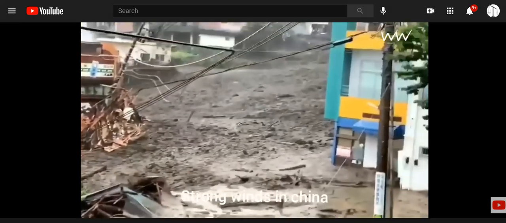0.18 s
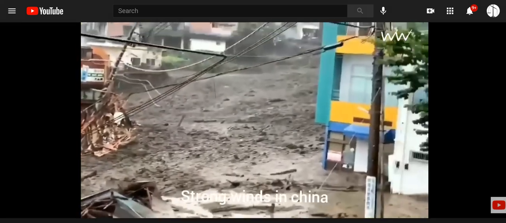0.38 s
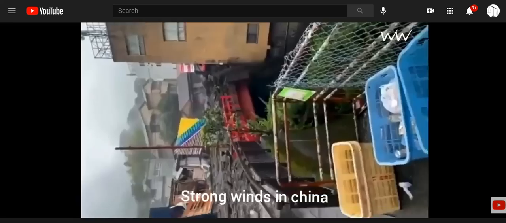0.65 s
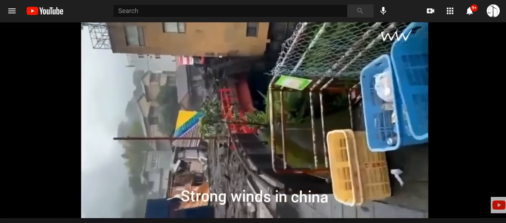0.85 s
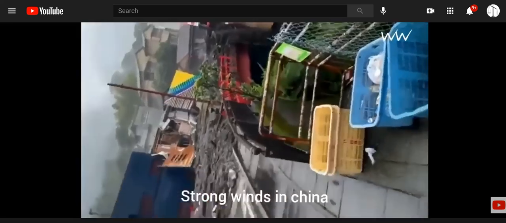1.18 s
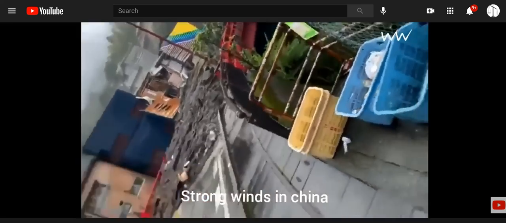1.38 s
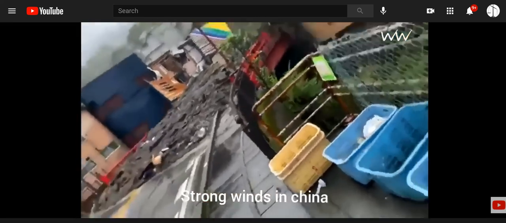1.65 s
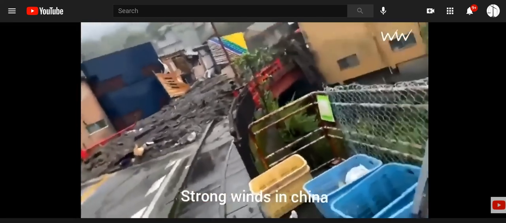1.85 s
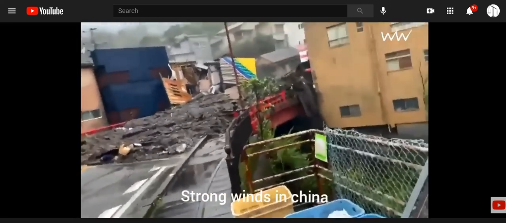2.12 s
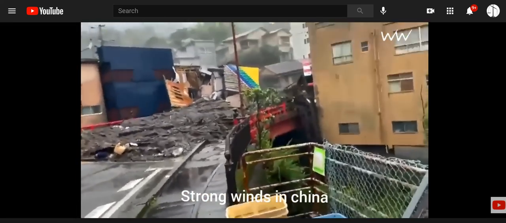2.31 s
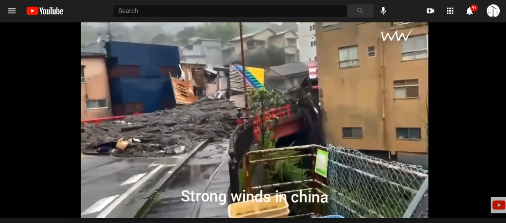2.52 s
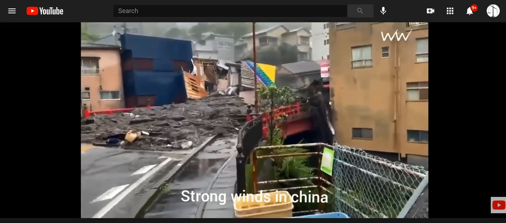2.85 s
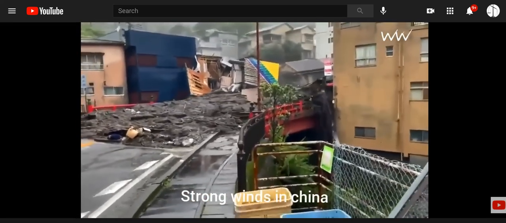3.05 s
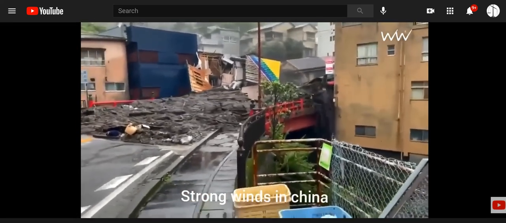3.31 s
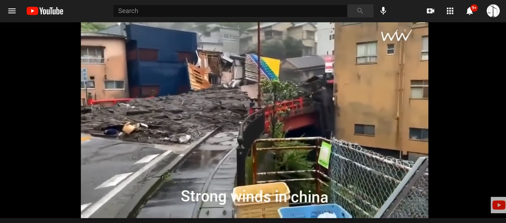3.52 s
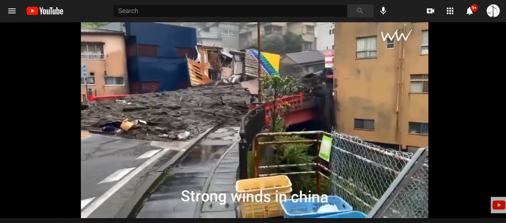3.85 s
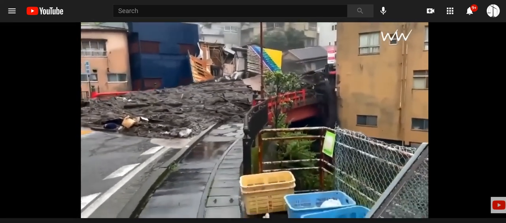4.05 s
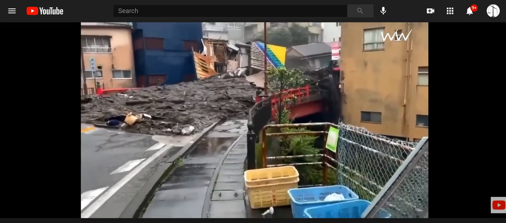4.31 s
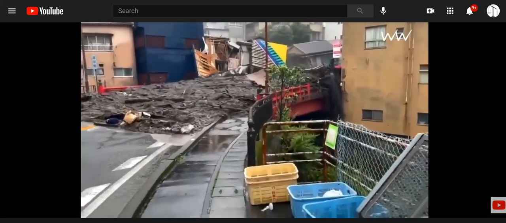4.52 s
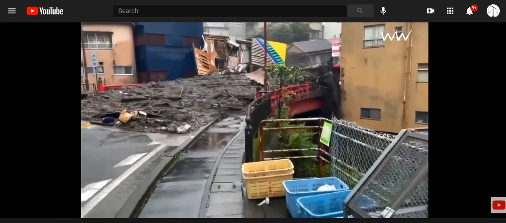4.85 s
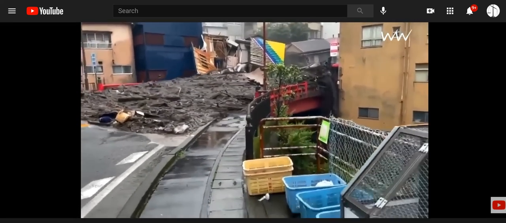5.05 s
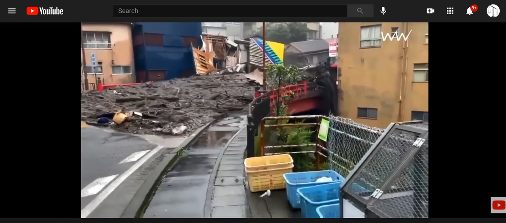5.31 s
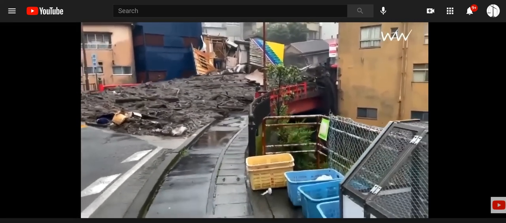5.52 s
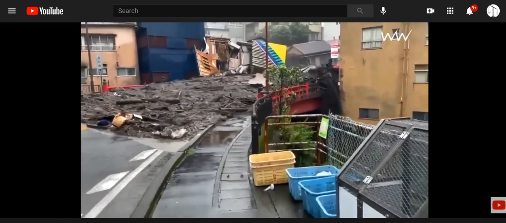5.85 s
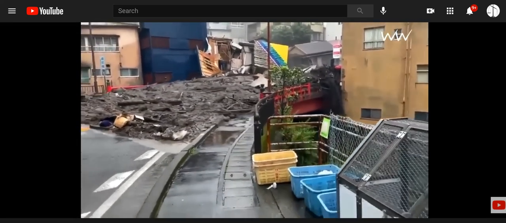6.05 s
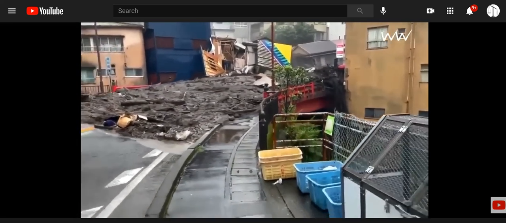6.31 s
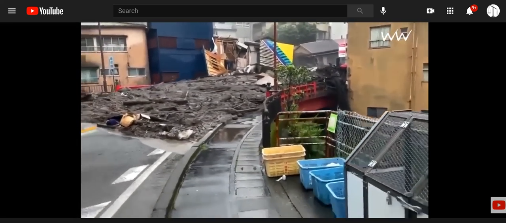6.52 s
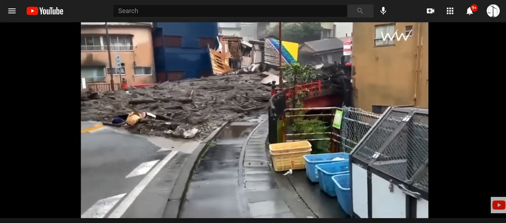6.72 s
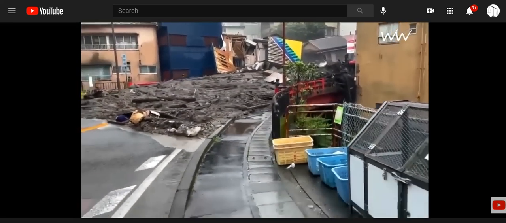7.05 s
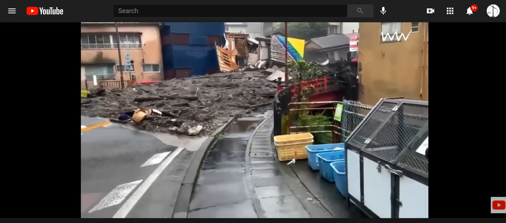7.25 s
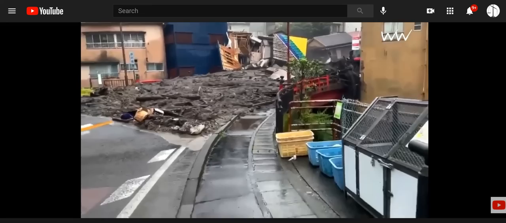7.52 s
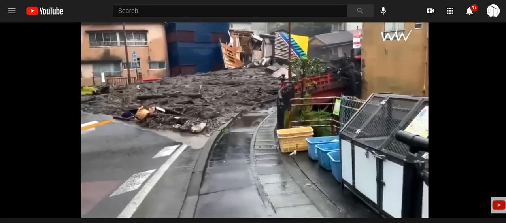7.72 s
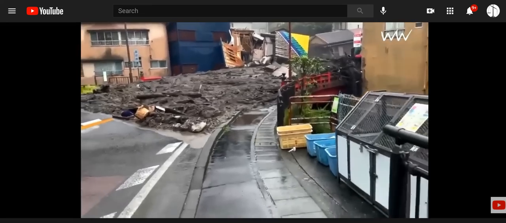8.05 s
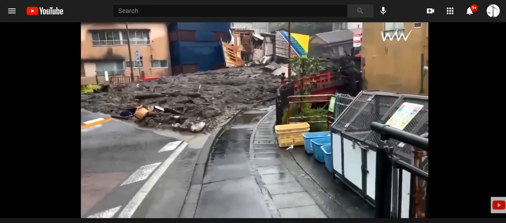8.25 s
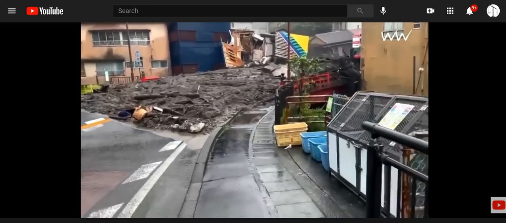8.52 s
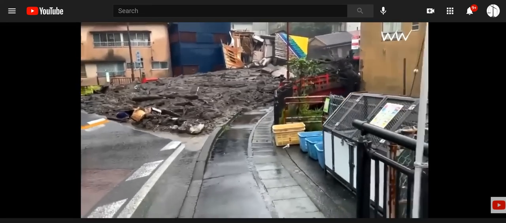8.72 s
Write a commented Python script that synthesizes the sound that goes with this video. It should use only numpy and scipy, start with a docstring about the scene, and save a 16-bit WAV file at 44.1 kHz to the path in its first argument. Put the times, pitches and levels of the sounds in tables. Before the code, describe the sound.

Mud and debris pour down a street: faint deep rumbling, a short gap, a loud close roar, then a somewhat quieter, wider rush.

```python
"""A mudslide pours down a street, heard in three passages: far off in stereo, a short silence,
close in mono, then a little further back in stereo. In each, boulders and mud rumble as low noise;
gravel, splinters and spray rush above as collision noise with brief tones, surging in patches.
From the close passage on, the rumble swells in low bursts (enveloped sines), waves of debris break
(brief level rises) and stones crack (struck modes)."""
import sys
import numpy as np
from scipy import signal
from scipy.fft import rfft, irfft, next_fast_len
from scipy.io import wavfile
from scipy.ndimage import uniform_filter1d

SR = 44100
rng = np.random.default_rng(int(sys.argv[2]) if len(sys.argv) > 2 else 0)


def store_pcm(level_fs):
    """Save levels as 16-bit WAV."""
    pcm = np.round(np.clip(level_fs, -1, 1) * 32767).astype(np.int16)
    wavfile.write(sys.argv[1], SR, np.atleast_2d(pcm).T)


N = 392049


def amp(db):
    """dB to gain."""
    return 10 ** (np.asarray(db) / 20)


def rms_one(x):
    """Scale to rms 1."""
    return x / np.sqrt(np.mean(x ** 2) + 1e-20)


def band_filter(band_hz):
    """First-order Butterworth band-pass."""
    return signal.butter(1, band_hz, "band", fs=SR, output="sos")


def drift(size, rate_hz):
    """Slow random drift: noise at every 40th sample through a double one-pole low-pass; rms 1."""
    step, settle = 40, 2000
    r = np.exp(-2 * np.pi * rate_hz * step / SR)
    noise = rng.standard_normal(size // step + settle + 2)
    slow = signal.lfilter([1], [1, -2 * r, r * r], noise)[settle:]
    return np.interp(np.arange(size) / step, np.arange(len(slow)), rms_one(slow))


def impacts(size, per_s, spread_db, share):
    """Countless collisions blur into noise; a share of the power stands out as uneven clicks."""
    sizes = amp(spread_db * np.minimum(rng.exponential(1, size), 5)) * rng.choice([-1, 1], size)
    clicks = rms_one(sizes * (rng.random(size) < per_s / SR))
    return np.sqrt(1 - share) * rng.standard_normal(size) + np.sqrt(share) * clicks


def brief_tones(size, band_hz, per_s, length_s):
    """Brief tones at random times and random pitches, anywhere in the band; rms 1."""
    start, pitch, turn, strength = rng.random((int(per_s * size / SR), 4)).T[:, :, None]
    steps = np.arange(int(length_s * SR))
    hz = band_hz[0] + pitch * (band_hz[1] - band_hz[0])
    tones = np.sin(2 * np.pi * (hz * steps / SR + turn))
    grains = (strength + .5) * np.hanning(len(steps)) * tones
    at = ((start * size).astype(int) + steps) % size
    return rms_one(np.bincount(at.ravel(), grains.ravel(), size))


def patches(source, spectrum, surge_db, own_db, own_rate_hz, count, tilt_db=0, pivot_hz=1):
    """Colour the source; overlapping bands waver singly, with a shared surge and tilt; rms 1."""
    size, (hz, level_db) = len(source), np.transpose(spectrum)
    octave_axis = np.log2(np.maximum(np.fft.rfftfreq(size, 1 / SR), 1))
    coloured = rfft(source) * amp(np.interp(octave_axis, np.log2(hz), level_db))
    centres = np.linspace(np.log2(hz[0]), np.log2(hz[-1]), count)
    out = 0
    for band, octaves in zip(np.eye(count), centres - np.log2(pivot_hz)):
        gain = amp(own_db * drift(size, own_rate_hz) + tilt_db * octaves)
        out = out + irfft(coloured * np.interp(octave_axis, centres, band), size) * gain
    return rms_one(out * amp(surge_db))


# stones and splinters: (time [s], level [dB])
CRACK_EVENTS = [(2.3971, -25), (5.7365, -33), (6.2401, -24), (6.2442, -33), (6.2765, -38), (8.2213, -31)]
# resonances of each crack: (frequency [Hz], level [dB], t60 [s])
CRACK_RESONANCES = [(4500, -6, 0.012), (5050, 2, 0.011), (5600, 2, 0.007), (6200, -1, .007)]
CRACK_CONTACT_S = .0006


def cracks():
    """Each crack strikes short modes, unevenly, over a brief contact."""
    s, peak_db = np.transpose(CRACK_EVENTS)
    chance_db = rng.normal(0, 1.5, (len(s), len(CRACK_RESONANCES)))
    out = np.zeros(N)
    contact = np.hanning(int(CRACK_CONTACT_S * SR) + 3)
    for (hz, level_db, t60_s), uneven_db in zip(CRACK_RESONANCES, chance_db.T):
        clicks = np.full(N, 1e-18)
        clicks[np.round(s * SR).astype(int)] = amp(peak_db + level_db + uneven_db)
        r, w = amp(-60 / (t60_s * SR)), 2 * np.pi * hz / SR
        push = contact / contact.sum() * 2 * np.sin(w * np.arange(len(contact)))
        blows = signal.lfilter(push, 1, clicks)
        out += signal.lfilter([0, np.sin(w)], [1, -2 * r * np.cos(w), r * r], blows)
    return out


# breaking debris: (time of crest [s], rise [dB])
WAVE_CRESTS = [(0.99, 2), (1.78, 3), (3.22, 5), (5.2, 2.5), (5.92, 6), (6.38, 4.5), (6.53, 2.5),
               (6.86, 1.5), (8.23, 2.5)]
WAVE_RISE_S, WAVE_FALL_S = 0.015, 0.024   # time constants


def waves(t):
    """Each breaking wave rises fast and sinks back more slowly; dB."""
    s, rise_db = np.transpose(WAVE_CRESTS)
    since = t - s[:, None]
    return rise_db @ np.exp(-np.abs(since) / np.where(since < 0, WAVE_RISE_S, WAVE_FALL_S))


SIDE_SPECTRA = [
    [(35, -55), (60, -28), (187, -3), (343, -3), (586, 2), (2590, -9), (5210, -9), (7210, -18), (8680, -11),
     (9760, -11), (11200, -34), (13800, -17), (15500, -47)],
    None,
    [(35, -56), (60, -26), (135, -32), (195, -24), (231, -20), (559, -3), (911, -11), (1550, -13),
     (1790, -21), (2590, 2.5), (3200, -6.5), (4300, -5), (5330, -14), (6100, -2.5), (7210, -0.5),
     (8890, -4.5), (10200, -17.5), (15500, -13)],
]
# per passage: (level against the rush [dB])
SIDE_LEVELS_DB = [5.5, 0, -3]
# gravel's lean to the right, last passage: (low [Hz], high [Hz], share moved across [1])
RIGHT_LEAN = (320, 1500, 0.18)


def sides(shot, surge, gravel, gravel_gain, spray_gain):
    """Separate wavering noise makes left and right differ; it follows gravel and spray levels."""
    side = patches(rng.standard_normal(len(surge)), SIDE_SPECTRA[shot], .7 * surge,
                   own_db=1.0, own_rate_hz=6.6, count=12)
    side = side * np.sqrt(gravel_gain * spray_gain) * amp(SIDE_LEVELS_DB[shot])
    if shot == len(PASSAGES) - 1:
        low_hz, high_hz, share = RIGHT_LEAN
        side = side - share * signal.sosfilt(band_filter((low_hz, high_hz)), gravel_gain * gravel)
    return side


# per passage: (frequency [Hz], relative density [dB/Hz])
SPRAY_SPECTRA = [
    [(1820, -56), (3100, -23), (4260, -8.5), (6210, -16.5), (6820, -15), (7300, -10.5), (8180, -19),
     (8990, -31), (11000, -17), (12500, -26), (13300, -46), (14700, -25), (15500, -36)],
    [(1820, -14.5), (3100, -14.5), (3700, -8), (4460, -6.5), (4970, -2.5), (5420, -2), (6510, -8),
     (6920, -19.5), (7300, -29), (7910, -27.5), (9240, -9.5), (9820, -20), (10000, -23), (11200, -32.5),
     (13100, -25.5), (15500, -32)],
    [(1820, -42), (3100, -15), (3790, -6), (4460, -5), (4840, -1.5), (5420, -1), (6460, -8), (6740, -11.5),
     (6870, -24), (7300, -29), (8800, -16), (9100, -13.5), (9490, -11), (10100, -11), (11800, -15),
     (15500, -29.5)],
]
SPRAY_TONES = 0.39   # amplitude of brief tones against hiss


def spray_rush(shot, surge):
    """Dense fine collisions hiss, with brief tones among them; rms 1."""
    size = len(surge)
    hiss = impacts(size, per_s=7000, spread_db=3.0, share=0.13)
    tones = brief_tones(size, (2000, 15500), per_s=700, length_s=0.048)
    return patches(hiss + SPRAY_TONES * tones, SPRAY_SPECTRA[shot], 0.59 * surge,
                   own_db=1.5, own_rate_hz=14.0, count=24)


# per passage: (frequency [Hz], relative density [dB/Hz])
GRAVEL_SPECTRA = [
    [(180, -29), (300, -14), (328, -10), (528, -0.5), (901, -17), (1130, -15.5), (1450, -21.5),
     (2470, -12.5), (3200, -24), (4160, -53), (7040, -120)],
    [(180, -58), (300, -14.5), (348, -9), (396, -0.5), (455, -5.5), (606, -2.5), (703, -5.5), (910, -14),
     (1020, -7.5), (1140, -6.5), (1390, -13), (2310, -14.5), (2520, -18.5), (2800, -19), (3000, -26.5),
     (3200, -31), (4160, -44), (7040, -120)],
    [(180, -65), (300, -9.5), (345, -7.5), (388, -2), (455, -6), (612, -3.5), (660, -6.5), (717, -7.5),
     (780, -11), (910, -16), (1090, -9.5), (1390, -17), (1580, -16), (2240, -17), (2520, -20), (2800, -23),
     (3200, -30), (4160, -29), (7040, -120)],
]


def gravel_rush(shot, surge, tilt_db):
    """Sparser collisions rattle in wavering bands; rms 1."""
    hits = impacts(len(surge), per_s=900, spread_db=3.0, share=0.17)
    return patches(hits, GRAVEL_SPECTRA[shot], 0.47 * surge, own_db=1.7, own_rate_hz=9.6, count=14,
                   tilt_db=tilt_db, pivot_hz=800)


# low swells, the loudest bursts of the rumble: (time [s], envelope peak level [dB], pitch [Hz])
LOW_SWELLS = [(1.26, -14, 140), (1.45, -19, 200), (2.005, -16.5, 180), (2.096, -28, 166.6),
              (2.643, -17, 202.5), (2.753, -12, 158.3), (3.397, -16, 164.3), (4.083, -22, 164),
              (4.331, -17, 196), (4.834, -20.5, 163), (5.79, -21.5, 171.4), (5.875, -21, 161),
              (6.099, -18.5, 173.4), (7.694, -22, 144.5), (8.026, -19.5, 216), (8.27, -18, 182),
              (8.552, -22.5, 170), (8.663, -14.5, 191)]
SWELL_PEAK_S = 0.015   # from onset to envelope peak


def low_swells():
    """Each low tone swells and dies within several cycles; random starting phase."""
    out, since = np.zeros(N + SR), np.arange(SR // 5) / SR
    shape = since ** 2 * np.exp(-2 * since / SWELL_PEAK_S)
    shape /= shape.max()
    for s, peak_db, hz in LOW_SWELLS:
        tone = np.sin(2 * np.pi * (hz * since + rng.random()))
        out[round(s * SR):][:len(since)] += amp(peak_db) * shape * tone
    return out[:N]


SQUEEZE_SHARE, SQUEEZE_S = 0.18, 0.0095   # share of swings removed, averaging time


def squeeze(x):
    """Gain follows short-time power and evens out the roar; rms 1."""
    power = uniform_filter1d(x ** 2, max(int(SQUEEZE_S * SR), 1)) + .05
    return rms_one(x * power ** (-SQUEEZE_SHARE / 2))


# per passage: (frequency [Hz], relative density [dB/Hz])
RUMBLE_SPECTRA = [
    [(12, -65), (20, -37), (43, -38), (61, -30), (90, -12.5), (155, -5), (247, -12.5), (340, -32.5),
     (440, -29.5), (750, -120)],
    [(12, -72), (20, -38), (37, -34), (60, -23.5), (129, -2.5), (150, -0.5), (192, 1.5), (217, -6.5),
     (259, -5.5), (340, -19), (440, -34.5), (750, -120)],
    [(12, -70), (20, -36), (43, -38), (57, -25), (88, -11.5), (130, -3.5), (184, -1), (199, -2.5),
     (250, -10), (285, -17), (317, -19.5), (340, -29.5), (440, -47), (750, -120)],
]


def boulder_rumble(shot, surge, tilt_db):
    """Boulders and mud mass: low noise in wavering bands, squeezed dense; rms 1."""
    noise = rng.standard_normal(len(surge))
    rumble = patches(noise, RUMBLE_SPECTRA[shot], 0.3 * surge, own_db=1.2, own_rate_hz=5.8, count=14,
                     tilt_db=tilt_db, pivot_hz=170)
    return squeeze(rumble)


# where rumble meets gravel: (low [Hz], high [Hz])
LOW_MIDDLE_BAND = (305, 473)
# (time [s], lift [dB])
LOW_MIDDLE_LIFT = [(0.1, -1.2), (0.32, 1.2), (0.6, -0.95), (1.2, -2.1), (2.2, 0.28), (3.1, -0.91),
                   (3.7, -0.26), (4.3, 1.1), (5.0, 0.091), (5.8, 0.68), (6.8, 1.2), (7.6, 0.077),
                   (8.2, -0.99), (8.8, -0.94)]


def lift_low_middle(mid, t):
    """Raise or lower the band by adding a zero-phase band-passed copy."""
    low_middle = signal.sosfiltfilt(band_filter(LOW_MIDDLE_BAND), mid)
    return mid + (amp(np.interp(t, *np.transpose(LOW_MIDDLE_LIFT))) - 1) * low_middle


# flow strength before waves, per passage: (time [s], rumble level [dB], gravel level [dB],
# spray level [dB], rumble tilt [dB/octave], gravel tilt [dB/octave])
FLOW_STRENGTH = [
    [(0.02, -30, -53, -51, .1, .1), (0.2, -31.5, -53.5, -51.5, .1, .1), (0.4, -33, -52.5, -52, .1, .1),
     (0.6, -28, -53.5, -52.5, 0.14, .1)],
    [(0.77, -21, -27.5, -32, -2, 0.0047), (1.0, -20, -28, -32, -1.5, 0.12),
     (1.3, -21.5, -28.5, -32, -2, 0.35), (1.5, -20, -28, -32, 0, .1),
     (1.75, -22.5, -30.5, -33.5, 0.8, -0.31), (1.9, -21.5, -32.5, -35.5, 1, -.3),
     (2.05, -22, -30.5, -36, -1.8, -0.41), (2.4, -23, -31.5, -35, -1, -0.14),
     (2.65, -21.5, -30.5, -34.5, -0.5, 0.011), (2.9, -21.5, -32, -36, -0.87, 0.16),
     (3.25, -20, -31.5, -36, 2, -0.26), (3.55, -21, -30, -33.5, 0.5, 0.45),
     (3.85, -21, -30.5, -32.5, -0.5, 0.69), (4.0, -20.5, -30.5, -33, 0, 0.63),
     (4.2, -22, -31.5, -34, 1.5, 0.23), (4.47, -23.5, -31, -34.5, 0.5, -0.1)],
    [(4.52, -24.5, -35, -40, 3, 0.48), (4.9, -25, -38, -41.5, -0.3, .8),
     (5.25, -28.5, -38, -41.5, 0.5, 0.53), (5.6, -25, -38.5, -42.5, 0.5, 0.5),
     (5.9, -26, -39, -43.5, 1, -0.076), (6.25, -26.5, -39, -43, 0, -0.058),
     (6.6, -26, -37.5, -41, 1.5, 0.14), (7.1, -27, -37.5, -41.5, -2.5, -0.27),
     (7.5, -27, -39, -43, -1.5, -0.65), (7.8, -26, -38.5, -43, -1.1, -0.73),
     (8.1, -25, -39.5, -45, -1, -0.098), (8.5, -24.5, -38, -44.0, -1.5, -0.61),
     (8.88, -25.5, -38.5, -45, -1, -0.66)],
]
WAVE_SPRAY_SHARE = 0.72   # share of the wave's dB rise


def mudslide(shot, t):
    """One passage: rumble, gravel and spray in the middle, separate rush at the sides if stereo."""
    size, (s, *columns) = len(t), np.transpose(FLOW_STRENGTH[shot])
    rumble_db, gravel_db, spray_db, rumble_tilt_db, gravel_tilt_db = [
        np.interp(t, s, column) for column in columns]
    wave_db = waves(t)
    gravel_gain = amp(gravel_db + wave_db)
    spray_gain = amp(spray_db + WAVE_SPRAY_SHARE * wave_db)
    # ripples of debris move all layers together
    surge = 0.5 * drift(size, 2.5) + 0.28 * drift(size, 35.5)
    rumble = boulder_rumble(shot, surge, rumble_tilt_db)
    gravel = gravel_rush(shot, surge, gravel_tilt_db)
    spray = spray_rush(shot, surge)
    mid = amp(rumble_db) * rumble + gravel_gain * gravel + spray_gain * spray
    mid = lift_low_middle(mid, t)
    if SIDE_SPECTRA[shot] is None:
        return np.array([mid, mid])
    side = sides(shot, surge, gravel, gravel_gain, spray_gain)
    return np.array([mid + side, mid - side])


# (start [s], end [s], fade-in [s], fade-out [s], fade steepness [exponent])
PASSAGES = [(-.1, 0.631, .01, 0.031, 4.0), (.746, 4.512, 0.021, .025, 3), (4.485, 9.0, 0.009, .01, 1.6)]


def scene():
    """Passages with short fades, plus cracks and low swells in the centre."""
    out = np.zeros((2, N)) + cracks() + low_swells()
    for shot, (start, end, fade_in, fade_out, steepness) in enumerate(PASSAGES):
        first, last = max(round(start * SR), 0), min(round(end * SR), N)
        t = (first + np.arange(next_fast_len(last - first))) / SR
        ramp = np.clip(np.minimum((t - start) / fade_in, (end - t) / fade_out), 0, 1)
        fade = np.sin(np.pi / 2 * ramp) ** steepness
        out[:, first:last] += (fade * mudslide(shot, t))[:, :last - first]
    return out


CUTOFF_HZ = 15690


def record(dry):
    """Steep elliptic low-pass cuts the top."""
    return signal.sosfilt(signal.ellip(12, .5, 80, CUTOFF_HZ, fs=SR, output="sos"), dry)


dry = scene()
out = record(dry)
store_pcm(out)
```